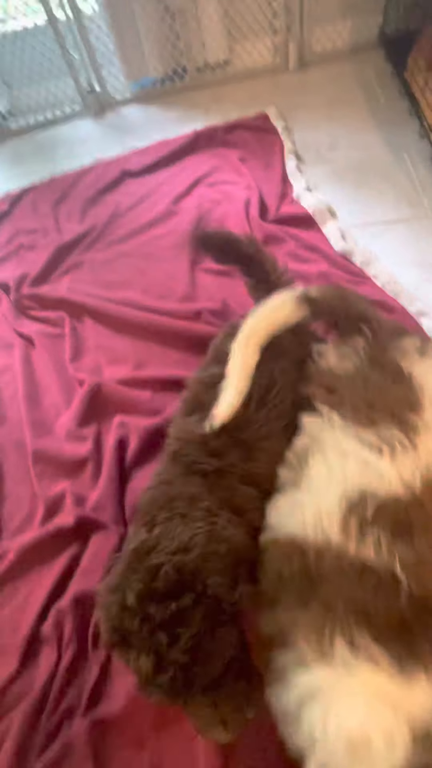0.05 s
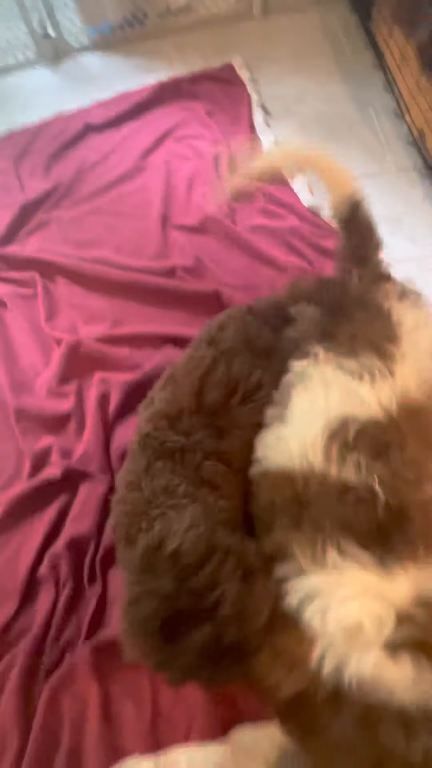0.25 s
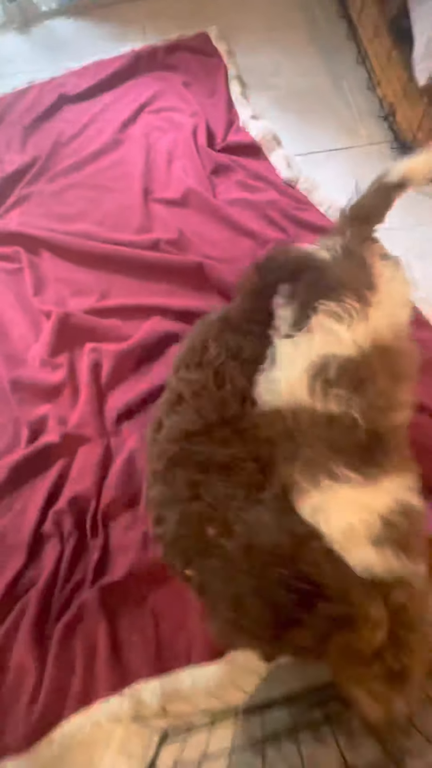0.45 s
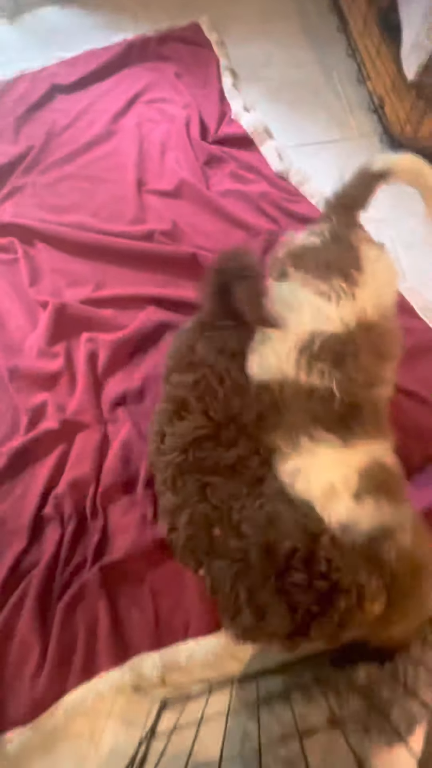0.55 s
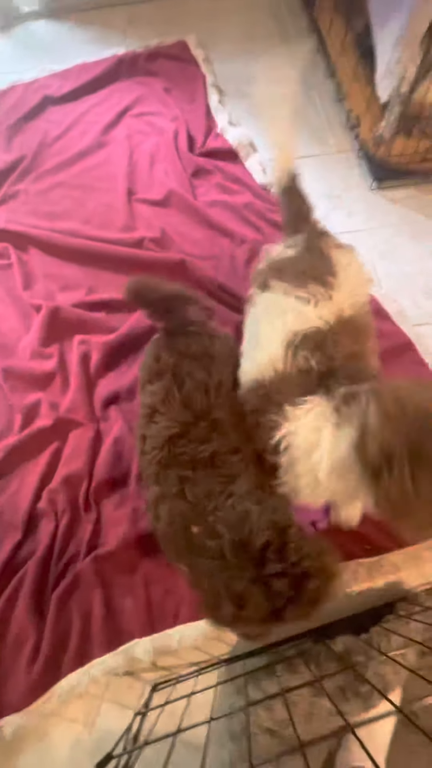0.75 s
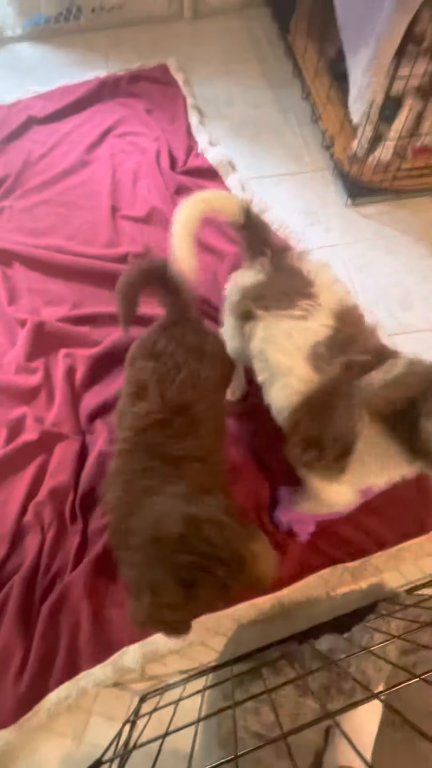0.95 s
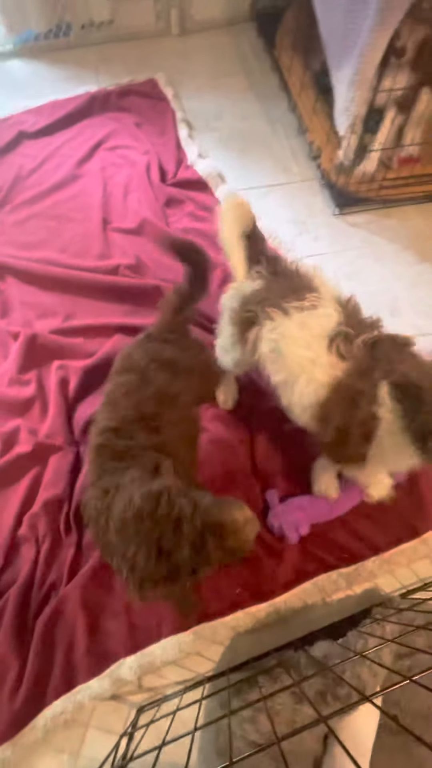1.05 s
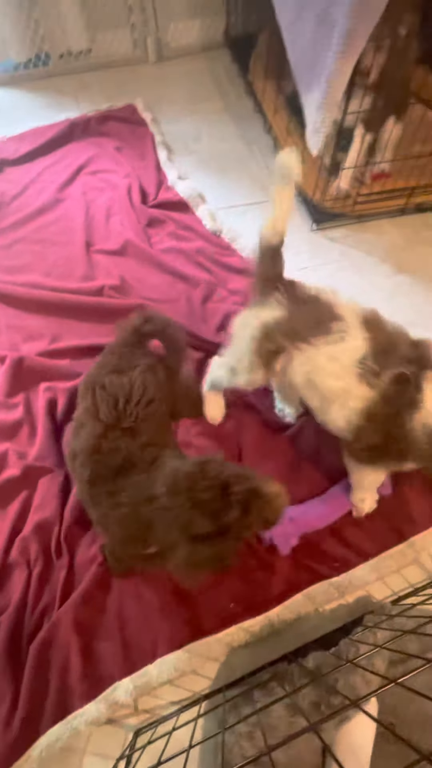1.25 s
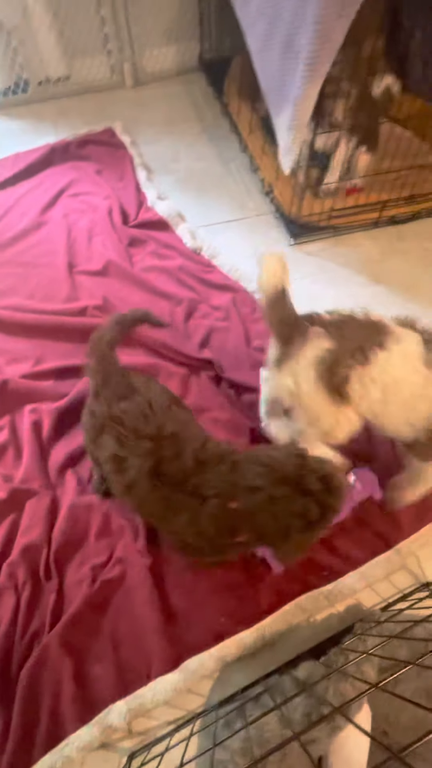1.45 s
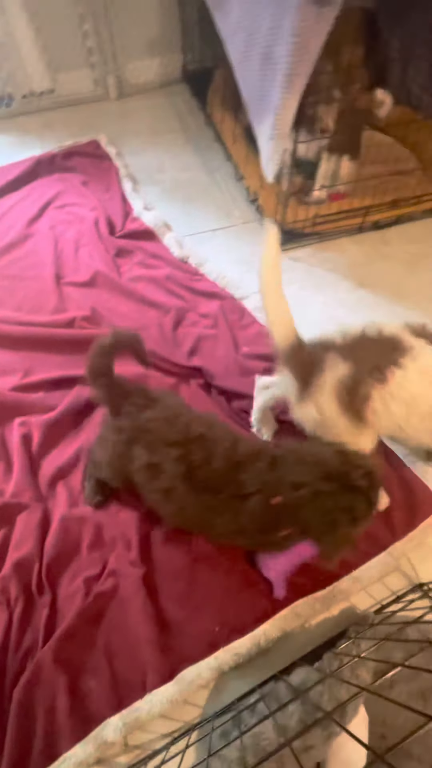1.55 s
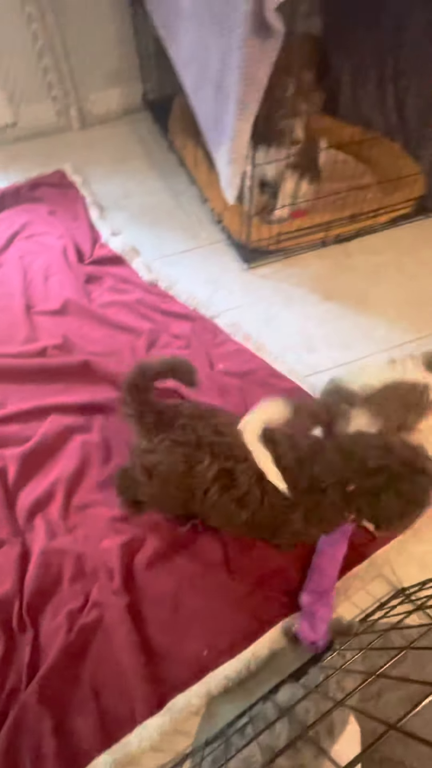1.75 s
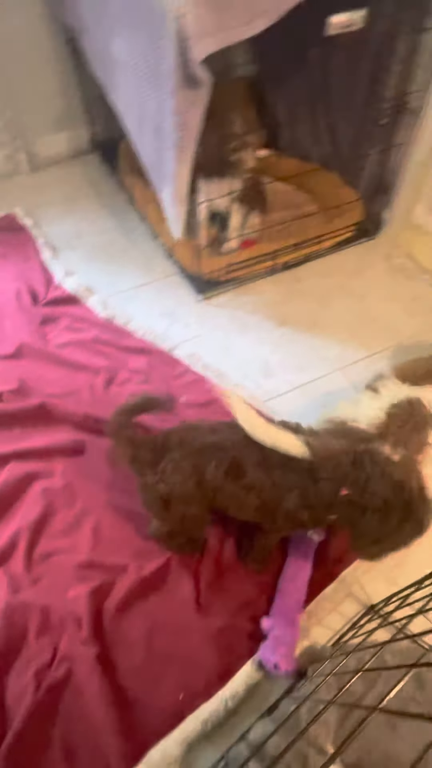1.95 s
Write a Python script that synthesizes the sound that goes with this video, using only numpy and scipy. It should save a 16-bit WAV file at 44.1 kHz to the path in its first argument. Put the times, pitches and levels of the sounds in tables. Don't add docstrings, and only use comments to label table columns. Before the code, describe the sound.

Puppy yelping close up: a loud high yip already under way, a sharp breaking bark, a softer yip and whimper, a lower bark, then quiet falling whines, with faint paw thumps in a ringing tiled room.

```python
import sys
import numpy as np
from scipy import signal
from scipy.fft import rfft, irfft, next_fast_len
from scipy.io import wavfile
from scipy.ndimage import uniform_filter1d

SR = 44100
rng = np.random.default_rng(int(sys.argv[2]) if len(sys.argv) > 2 else 0)


def field_ratio(decibels):
    return 10 ** (np.asarray(decibels, dtype=float) / 20)


def inscribe(sig):
    pcm = np.round(np.clip(np.atleast_2d(sig).T, -1, 1) * 32767)
    wavfile.write(sys.argv[1], SR, pcm.astype(np.int16))


N = 88200


def evened(x):
    return x / np.sqrt(np.mean(x ** 2) + 1e-20)


def read(points, hz):
    f, value = np.transpose(points)
    return np.interp(np.log(hz + 1), np.log(f + 1), value)


def add(mix, s, sound):
    part = mix[..., round(s * SR):][..., :sound.shape[-1]]
    part += sound[..., :part.shape[-1]]


def coloured(x, points):
    size = next_fast_len(len(x) + 2048)
    hz = np.fft.rfftfreq(size, 1 / SR)
    low_cut = 1 + (.8 * points[0][0] / (hz + 1)) ** 12
    return irfft(rfft(x, size) * field_ratio(read(points, hz)) / low_cut, size)[:len(x)]


def voice(call, mouth, flutter_db):
    flutter_s, fade_s = .02, .006
    wobble, jitter, shimmer_db = 0.0059, 0.025, 8
    half_from, half_full = .2, .33
    breath_width, breath_tilt_db = 0.51, 8

    s, *curves = np.transpose(call)
    t = np.arange(s[0], s[-1], 1 / SR)
    hz, db, rough, opening = (np.interp(t, s, curve) for curve in curves)
    noise = rng.standard_normal((2, SR // 2))[:, :len(t)]
    hz = hz * (1 + (wobble + jitter * rough) * evened(uniform_filter1d(noise[0], size=120)))
    turns = np.cumsum(hz) / SR

    k = np.arange(1, 61)[:, None] / 2
    partial_hz = k * hz
    steps = rng.standard_normal((60, 30))
    flutter = np.array([np.interp((t - s[0]) / flutter_s, np.arange(len(row)), row) for row in steps])
    flutter = flutter * ((partial_hz > 1250) | (partial_hz < 560))
    half = np.where(k % 1, np.clip((rough - half_from) / (half_full - half_from), 0, 1), 1)
    heights = field_ratio(read(mouth, partial_hz) + opening * np.log2(k) + flutter_db * flutter)
    heights = heights * (partial_hz < 15500) * half
    folds = (heights * np.cos(2 * np.pi * k * turns + k ** 2 / 2)).sum(0)
    folds = folds / np.sqrt((heights ** 2).sum(0) / 2)
    stumble = np.clip(evened(uniform_filter1d(noise[0, ::-1], size=200)), -2, 1)
    folds = folds * field_ratio(shimmer_db * rough * stumble)

    airy = [(f, level + breath_tilt_db * np.log2(f / 1000)) for f, level in mouth]
    puffs = evened(coloured((0.14 + np.exp(-(turns % 1) / breath_width)) * noise[1], airy))
    edge = np.minimum(np.minimum(t - s[0], s[-1] - t) / fade_s, 1) ** 2
    return s[0], edge * field_ratio(db) * (np.sqrt(1 - rough ** 2) * folds + rough * puffs)


def whistle(start, length, hz_from, hz_to, db):
    u = np.arange(0, length, 1 / SR) / length
    waver = evened(uniform_filter1d(rng.standard_normal(SR // 4), size=200))[:len(u)]
    hz = hz_from + (hz_to - hz_from) * u ** 3 + 60 * waver
    return start, field_ratio(db) * np.sin(np.pi * u) ** .5 * np.sin(2 * np.pi * np.cumsum(hz) / SR)


def puppies():
    # (time [s], pitch [Hz], level [dB], roughness [0-1], mouth opening [dB/octave])
    yip_1 = [(-.12, 1168, -4.5, 0, 1), (-.08, 1207, -17.5, 0, -3), (.03, 1226, -24, 0.06, 2.5),
             (.065, 1247, -19.5, 0.1, 4), (.088, 1224, -19, 0, 1), (.115, 1159, -12, 0, -5.5),
             (.132, 1167, -21.5, 0.06, -5.5), (.185, 1164, -34.5, 0, 4.5), (.21, 1234, -91, 0, -8)]
    bark_1 = [(.388, 722.7, -27, 0.06, 8), (.399, 782.2, -5.5, 0.06, -8.5), (.407, 815.6, -13, 0.23, 4.5),
              (.421, 859.8, -10, 0.22, -1.5), (.427, 976.6, -10, 0.37, -3.5),
              (.445, 1039, -16.5, 0.57, 1.5), (.465, 1058, -20.5, 0.29, 4),
              (.52, 993.3, -28.5, 0.15, -18.5), (.6, 988.5, -33, 0.35, -8)]
    yip_2 = [(.645, 1122, -36, 0.12, 13), (.66, 1002, -21.5, 0.13, -0.5), (.69, 1007, -22.5, 0.055, 2),
             (.708, 1071, -21.5, 0.073, 1), (.722, 989.5, -28.5, 0.039, -6.5), (.732, 1031, -44, 0.017, 0),
             (.752, 1016, -33.5, 0.026, 0), (.775, 1017, -41, 0.026, 0.5), (.8, 992, -36, 0.026, -13)]
    bark_2 = [(1.081, 629, -29, 0.01, -19), (1.092, 591.6, -30.5, 0.06, -12),
              (1.103, 586, -26.5, 0.073, -1), (1.108, 421.7, -15, 0.16, -1),
              (1.123, 457.7, -14.5, 0.2, -0.5), (1.142, 468.2, -13.5, 0.14, 0), (1.152, 520, -13, 0.14, -3),
              (1.178, 514.8, -29, 0.12, 2), (1.28, 507.4, -36.5, 0.14, -4.5)]
    whine_1 = [(1.457, 852, -24, 0.033, -5), (1.472, 858.3, -36, 0.052, 1.5), (1.5, 901.5, -30, 0.1, 0.5),
               (1.527, 814.4, -19, 0.02, -3.5), (1.555, 733.6, -34, 0.013, -0.5),
               (1.61, 696, -39.5, 0.011, -3), (1.67, 651.7, -31.5, 0.0067, -2), (1.71, 627, -56, 0.0094, 6),
               (1.725, 620, -57, 0.025, -16)]
    whine_2 = [(1.715, 634, -40, 0.047, 12), (1.735, 522, -44.5, 0.049, -19.5),
               (1.8, 502.3, -43, 0.028, -7), (1.83, 494.8, -44, 0.0091, 6),
               (1.86, 488.5, -40.5, 0.019, 5.5), (1.9, 479.2, -43, 0.01, 2.5), (1.925, 498, -46, 0.012, 3),
               (1.94, 505, -45.5, 0.0083, -3), (1.965, 470, -50, 0.0047, -12)]
    whimper_1 = [(.72, 928, -21, 0.012, 4.5), (.75, 912, -27, 0.012, -7), (.78, 920, -50, 0.0069, 5),
                 (.82, 948, -37.5, 0.068, 7), (.855, 951, -31, 0.032, 3), (.875, 857, -38.5, 0.025, 5),
                 (.895, 800, -47, .04, 0)]
    whimper_2 = [(1.2, 965, -21, .02, -7), (1.25, 974.4, -36, .02, -7), (1.3, 950.6, -44, .02, -11),
                 (1.36, 896, -36.5, 0.025, 2.5), (1.41, 844, -41, .02, -1.5), (1.45, 850, -51, .02, 0)]
    # (frequency [Hz], level [dB])
    mouth_yip_1 = [(1200, 8.5), (2450, -4), (3650, -22.5), (4950, -21.5), (6150, -19), (8500, -36),
                   (11000, -33), (15000, -24)]
    mouth_bark_1 = [(500, -16), (780, 8), (1000, 8), (1570, 3.5), (2300, -2), (3700, -18.5), (5900, -45.5),
                    (8200, -46)]
    mouth_yip_2 = [(950, 4.5), (2050, -2), (3050, -21.5), (4200, -23), (5000, -17.5), (7000, -37),
                   (9200, -39), (12500, -48)]
    mouth_bark_2 = [(450, -23), (900, 7), (1250, -11), (1600, -6), (2300, -7), (3900, -22.5), (6300, -47),
                    (8100, -44)]
    mouth_whine_1 = [(650, 9.5), (850, 1.5), (1400, -12), (1780, -18.5), (2600, -27.5), (3800, -36.5),
                     (5000, -20.5), (9000, -56)]
    mouth_whine_2 = [(490, 0.5), (990, 2.5), (1500, -23.5), (2000, -23.5), (2480, -17.5), (2960, -25.5),
                     (3600, -50), (9000, -92)]
    mouth_whimper = [(850, 13), (950, 11.5), (1900, -12.5), (2800, -16.5), (3750, -15), (4770, -19),
                     (6000, -34), (10000, -50.5)]
    # (left-right [dB], room [dB], wavering of each partial [dB])
    places = [
        (0.5, -1.5, 5),
        (0.5, -4.5, 2.5),
        (0.5, 1.4, 1.5),
        (0.6, -2.5, 5),
        (0.5, -4, 8.5),
        (0, -5.5, 1),
        (1.5, -1, 1),
        (6.5, -3, 2.5),
    ]
    # (start [s], length [s], start pitch [Hz], end pitch [Hz], level [dB])
    whistles = [
        (0.437, 0.19, 6940, 7750, -53),
        (0.764, 0.058, 7430, 7400, -61),
        (1.218, 0.11, 6950, 7810, -57.5),
        (1.932, 0.028, 4035, 3700, -57),
    ]

    calls = [(yip_1, mouth_yip_1), (bark_1, mouth_bark_1), (yip_2, mouth_yip_2), (bark_2, mouth_bark_2),
             (whine_1, mouth_whine_1), (whine_2, mouth_whine_2),
             (whimper_1, mouth_whimper), (whimper_2, mouth_whimper)]
    sounds = [voice(call, mouth, place[2]) for (call, mouth), place in zip(calls, places)]
    sounds += [whistle(*row) for row in whistles]
    spots = list(places) + [(0.016, 0.045, 0)] * len(whistles)

    lead_s = .15
    lead = round(lead_s * SR)
    mix = np.zeros((2, N + lead))
    for (s, sound), (pan_db, room_db, _) in zip(sounds, spots):
        direct = np.pad(sound, (0, SR))
        sides = field_ratio(np.array([[.5], [-.5]]) * pan_db)
        add(mix, s + lead_s, (direct + field_ratio(room_db) * room(direct)) * sides)
    return mix[:, lead:]


def thump(start, db, hz, t60):
    t = np.arange(SR // 3) / SR
    colour = [(hz / 2, -12), (hz, 0), (hz * 2, -10), (hz * 8, -35), (16000, -70)]
    body = evened(coloured(rng.standard_normal(len(t)), colour))
    return start, field_ratio(db - 60 * t / t60) * np.minimum(t / 0.0013, 1) ** 2 * body


def paws():
    # (time [s], level [dB], pitch [Hz], t60 [s])
    thumps = [(0.34, -48, 62, 0.51), (0.885, -46.5, 555, 0.41), (1.39, -58.5, 44.4, 0.31),
              (0.638, -50.5, 210, 0.66), (0.866, -44, 96, 0.16), (1.002, -57.5, 44.4, 0.54),
              (1.578, -44, 215, 0.19), (1.58, -44.5, 61.6, 0.68), (1.679, -65, 96, 0.074),
              (1.771, -52.5, 45, 1), (1.969, -42.5, 286, 1), (1.968, -48.5, 694, 0.13)]
    floor = np.zeros(N)
    for row in thumps:
        add(floor, *thump(*row))
    return floor + field_ratio(-14) * room(floor)


def room(x):
    # (frequency [Hz], t60 [s])
    ring = [(250, 0.9), (600, 0.38), (1200, 0.42), (2500, 0.5), (5000, 0.43), (10000, 0.21)]
    # (frequency [Hz], level [dB])
    echo_colour = [(250, -59), (500, 4.5), (760, -0.5), (1000, -4), (2200, -5), (5000, -6), (10000, -4)]
    gap_s, share = 0.0046, 0.21

    taps = np.zeros((2, SR))
    at = np.arange(0, SR - 20, 20) + rng.integers(0, 20, (2, (SR - 1) // 20))
    np.put_along_axis(taps, at, rng.choice([-1., 1.], at.shape), 1)
    taps[1] = share * taps[0] + np.sqrt(1 - share ** 2) * taps[1]
    hz, t, z = signal.stft(taps, SR, nperseg=512)
    decay_db = read(echo_colour, hz)[:, None] - 60 * t / read(ring, hz)[:, None]
    tail = signal.istft(z * field_ratio(decay_db), SR, nperseg=512)[1]
    tail = tail / np.linalg.norm(tail, axis=1, keepdims=True)
    tail = np.pad(tail, ((0, 0), (round(gap_s * SR), 0)))
    return signal.fftconvolve(x[None], tail, axes=1)[:, :len(x)]


def hum():
    # (frequency [Hz], level [dB])
    house = [(30, 1), (60, -4.5), (230, -4), (500, -10), (1500, -14), (4000, -21), (8000, -31),
             (13000, -34)]
    # (frequency [Hz], left-right likeness [0-1])
    likeness = [(40, .97), (150, .92), (300, .5), (1000, .4), (10000, .6)]
    frames, hz = N // 256 + 5, np.fft.rfftfreq(1024, 1 / SR)
    a, b, c, d, patches = rng.standard_normal((frames, 513, 5)).T
    patches = uniform_filter1d(patches, size=8, axis=0)
    patches = evened(uniform_filter1d(patches, size=12, axis=1))
    same = read(likeness, hz)[:, None]
    left = a + 1j * b
    right = same * left + np.sqrt(1 - same ** 2) * (c + 1j * d)
    z = np.array([left, right]) * field_ratio(read(house, hz)[:, None] + 3.5 * patches)
    return field_ratio(-55.5) * evened(signal.istft(z, nperseg=1024, noverlap=768)[1][:, :N])


def scene():
    return puppies() + paws() + hum()


def top_cut(x):
    return signal.sosfilt(signal.butter(12, 12310, fs=SR, output="sos"), x)


def record(dry):
    # (frequency [Hz], left lead [rad])
    port_phase = [(250, 0), (500, -1.8), (770, -1.9), (900, -4.2), (1700, -5.2), (5300, -5.3), (8500, -2.1),
                  (10500, 0)]
    # (frequency [Hz], left-right [dB])
    port_balance = [(300, 2), (550, 2), (800, -7), (1000, -1.5), (2100, 3), (3200, -1.5), (4000, -0.5),
                    (8000, -1.5)]
    # (frequency [Hz], level [dB])
    scene_treble = [(6800, -0.5), (8200, 7), (9300, -4.5), (11000, -3), (12500, -16.5)]
    size = next_fast_len(N + 4096)
    hz = np.fft.rfftfreq(size, 1 / SR)
    sides = np.array([[.5], [-.5]])
    turn = np.exp(1j * read(port_phase, hz) * sides)
    turn = turn * field_ratio(read(scene_treble, hz) + read(port_balance, hz) * sides)
    x = irfft(rfft(dry, size) * turn, size)[:, :N]

    knee, ceiling = .7, .95
    over = np.maximum(abs(x) - knee, 0)
    bent = (ceiling - knee) * np.tanh(over / (ceiling - knee))
    return top_cut(x - np.sign(x) * (over - bent))


dry = scene()
out = record(dry)
inscribe(out)
```